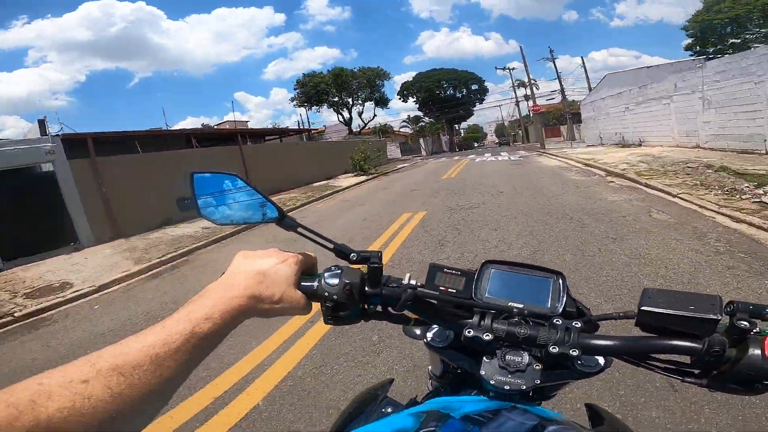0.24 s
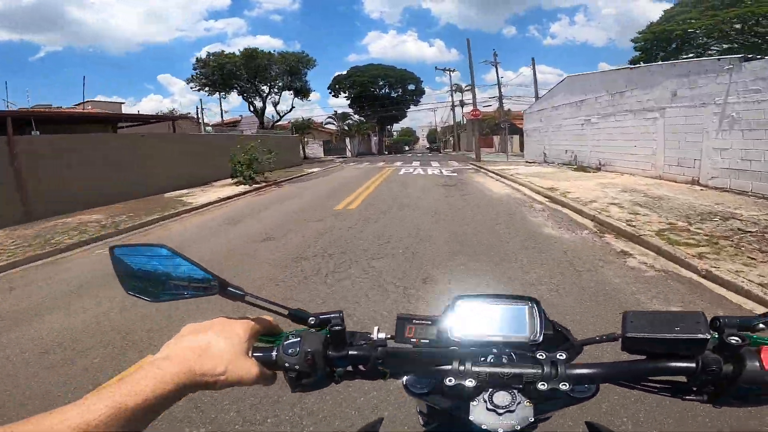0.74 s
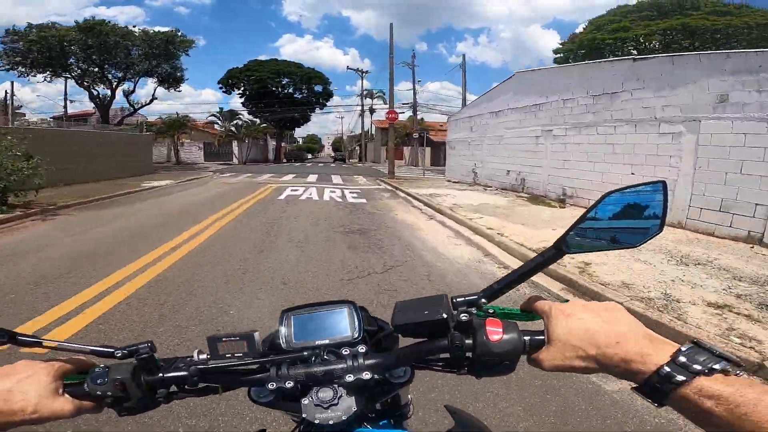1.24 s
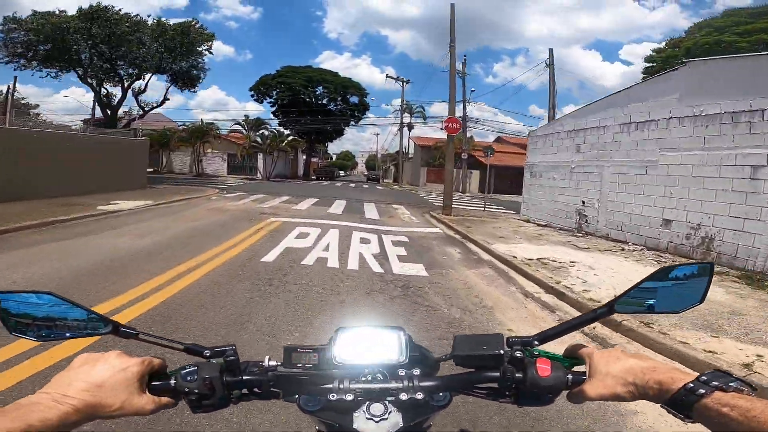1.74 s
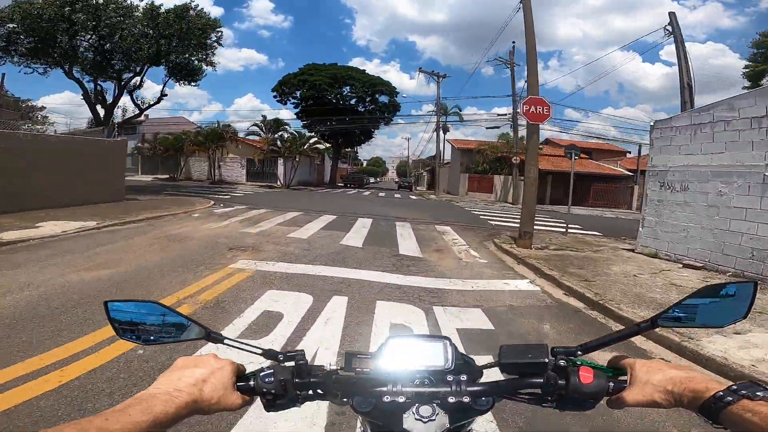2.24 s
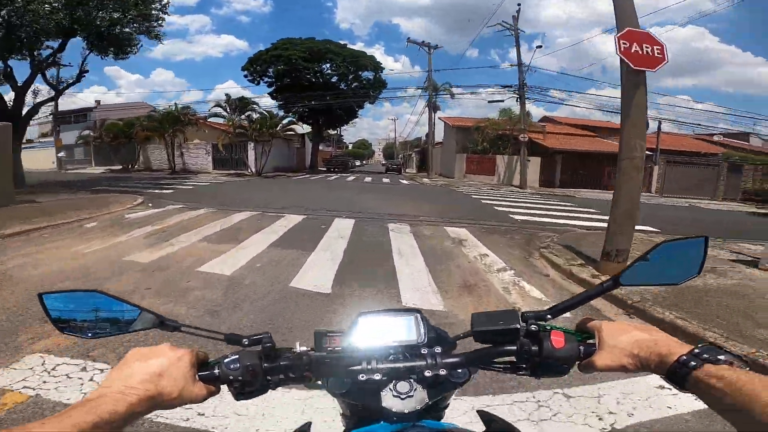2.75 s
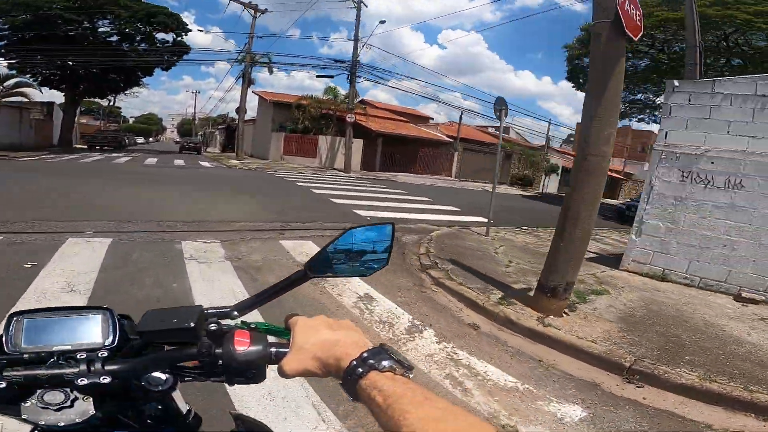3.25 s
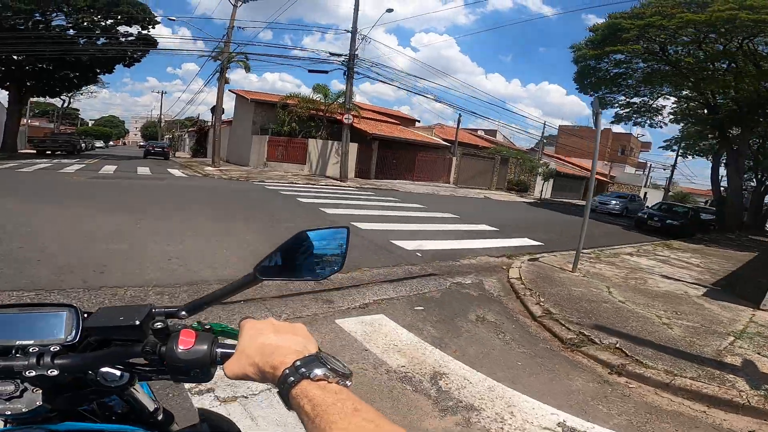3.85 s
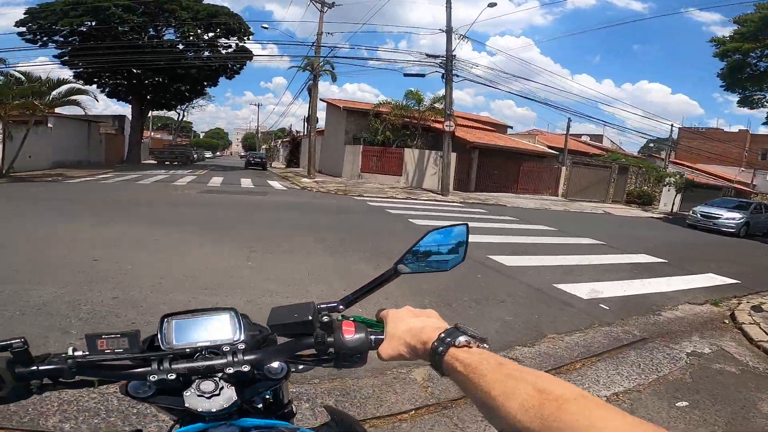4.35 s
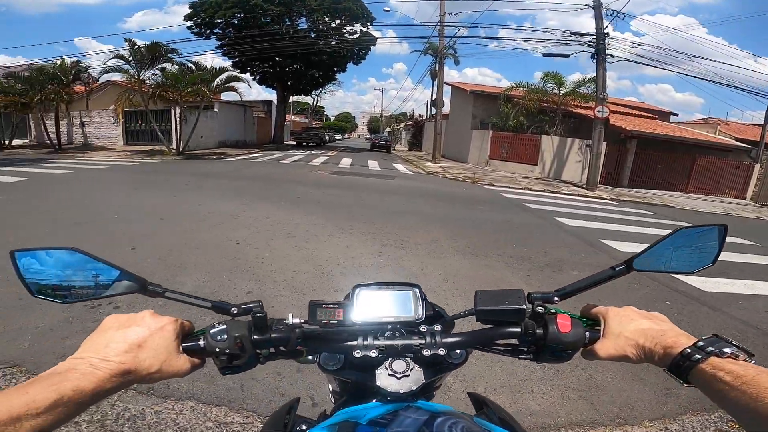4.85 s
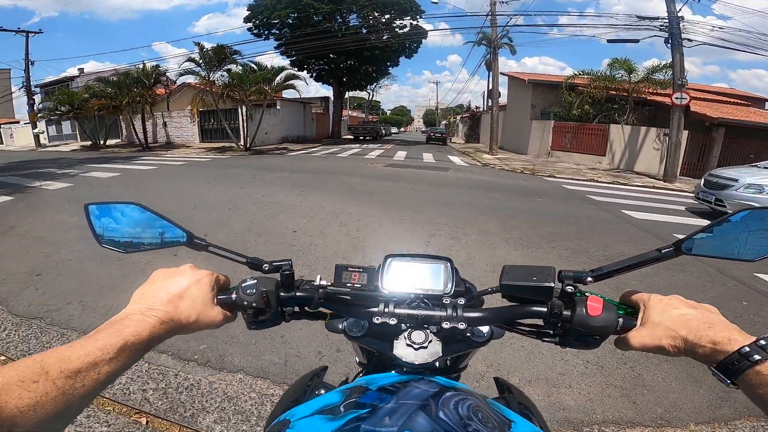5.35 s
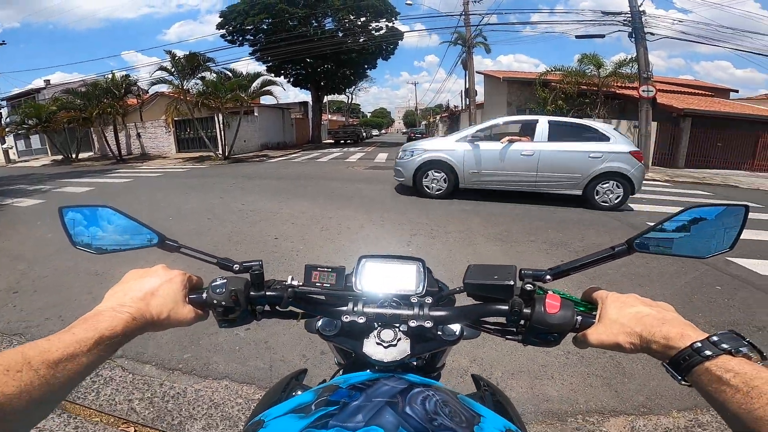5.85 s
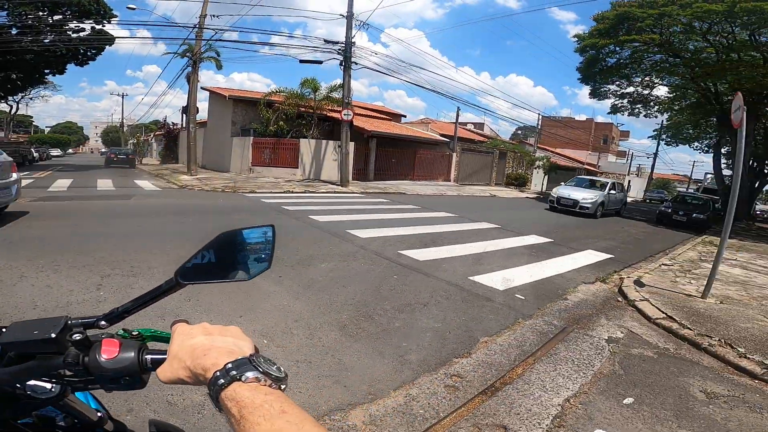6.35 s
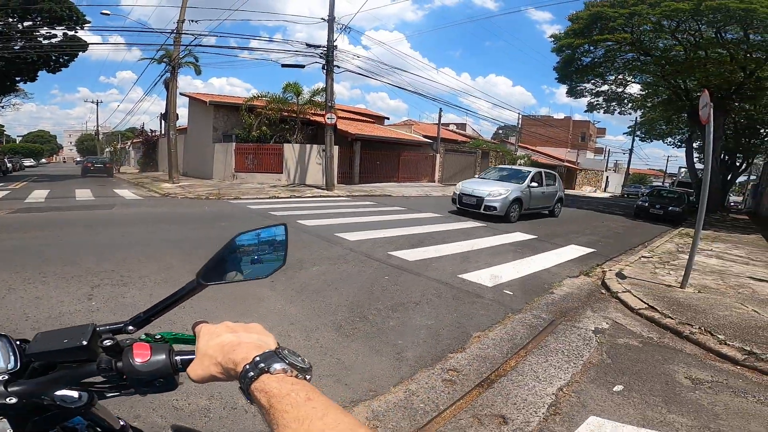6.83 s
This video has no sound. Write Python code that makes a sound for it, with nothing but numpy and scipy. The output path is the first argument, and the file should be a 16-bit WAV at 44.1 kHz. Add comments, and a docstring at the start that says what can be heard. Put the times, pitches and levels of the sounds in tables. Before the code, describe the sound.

Close, dry outdoor sound from a motorcycle saddle, dominated by a four-cylinder engine through a loud open exhaust. It starts at higher revs, around 110 firings a second, and falls abruptly by 0.3 s with a brief sag in its bark. From 0.4 to 1.4 s it pulls smoothly at low revs, pitch rising slightly; a thin squeak sounds near 1.1 s. At about 1.4 s the throttle shuts and the note drops, becoming rougher. Tiny high brake chirps run from 1.7 to 2.5 s, with a dull gearbox clunk at 2.0 s. Revs bottom out near 2.3 s, then recover to a steady, loping idle near 80 firings a second by 3.5 s: deep boom, hollow bark, raspy tailpipe, fine valve ticking, uneven weak beats. A crisp metallic clack comes at 5.8 s, smaller ones around 6.3 and 7 s, while a faint car-like rush swells beneath the idle around 6.3 s.

```python
"""A road junction, from a motorcycle's saddle: four cylinders and an open exhaust, close to the microphone.
The bike rolls up pulling briefly at very low revs, the throttle shuts, and it settles into a loud, loping idle.
Each firing rings the pipe as drone, bark, honk and blare, low to high, over a boom at the firing rate.
Noise shaped by the firings makes the tailpipe's rasp and the valve gear's ticks; bands of noise make squeaks,
chirps and the rush of what is probably a passing car; noise bursts clack, a struck resonance clunks."""
import sys
import numpy as np
from scipy import signal
from scipy.fft import rfft, irfft
from scipy.io import wavfile
from scipy.ndimage import uniform_filter1d, minimum_filter1d

SR = 44100
rng = np.random.default_rng(int(sys.argv[2]) if len(sys.argv) > 2 else 0)


def wav_record(signal):
    """Record a signal, one row per channel, as 16-bit PCM in the file named by sys.argv[1]."""
    frames = np.transpose(np.atleast_2d(signal))
    bounded = np.clip(frames, -1, 1)
    # unit amplitude maps onto the largest positive 16-bit level
    quanta = np.round(bounded * 32767).astype(np.int16)
    wavfile.write(sys.argv[1], SR, quanta)


N = 312669
TIME = np.arange(N) / SR
IDLE_HZ = 79.5  # firings per second at idle


def from_db(db):
    """Decibels to gain."""
    return 10 ** (np.asarray(db) / 20)


def in_time(rows):
    """The columns of a curve at every sample."""
    s, *columns = np.transpose(rows)
    return [np.interp(TIME, s, c) for c in columns]


def moment(centre_s, half_length_s):
    """A bell-shaped swell that peaks at 1 and is 1/e at the half length."""
    return np.exp(-((TIME - centre_s) / half_length_s) ** 2)


def evened(x, size=8820):
    """Level held at rms 1 over a fifth of a second; faster throbs stay."""
    return x / np.sqrt(np.maximum(uniform_filter1d(x * x, size), 1e-14))


def cut(x, hz, kind, order=4):
    """Butterworth filter."""
    return signal.sosfilt(signal.butter(order, hz, kind, fs=SR, output="sos"), x)


def resonate(x, modes):
    """Parallel resonances of (frequency [Hz], width [Hz], gain [dB])."""
    out = np.zeros(N)
    for hz, width, db in modes:
        r = np.exp(-np.pi * width / SR)
        zeros = np.array([1, 0, -1]) * (1 - r * r) / 2
        poles = [1, -2 * r * np.cos(2 * np.pi * hz / SR), r * r]
        out += from_db(db) * signal.lfilter(zeros, poles, x + 1e-18)
    return out


def coloured(x, spectrum, size=2048):
    """Causal (minimum-phase) filter of unit energy that follows a spectrum."""
    hz, db = np.transpose(spectrum)
    grid = np.maximum(np.arange(size // 2 + 1) * SR / size, 1)
    gain = from_db(np.interp(np.log(grid), np.log(hz), db))
    cepstrum = irfft(np.log(gain))[:size // 2]
    response = irfft(np.exp(rfft(2 * cepstrum, size)))
    return signal.fftconvolve(x, response / np.linalg.norm(response))[:N]


def clicks(times, sizes):
    """Impulses placed between samples."""
    at = np.clip(times * SR, 0, N - 2)
    whole = at.astype(int)
    early = np.bincount(whole, sizes * (1 - at + whole), N)
    return early + np.bincount(whole + 1, sizes * (at - whole), N)


def dying(x, decay_s):
    """Every impulse becomes an exponential tail that falls to 1/e in decay_s."""
    return signal.lfilter([1], [1, -np.exp(-1 / (decay_s * SR))], x + 1e-18)


def wander(hz):
    """Slow chance of spread 1, changing about hz times a second."""
    slow = cut(rng.standard_normal(N + SR), hz, "low", order=2)[SR:]
    return slow / np.std(slow)


# engine speed: (time [s], firing rate [1/s])
SPEED = [(0, 109), (.07, 110), (.15, 86), (.27, 87.8), (.34, 74.9), (.6, 77.4), (1.27, 85.65),
         (1.42, 82.85), (1.5, 75.8), (1.75, 74.8), (2.05, 70.9), (2.35, 70.1), (2.6, 74.15), (3.0, 77.65),
         (3.5, 78.65), (4.2, 79.9), (4.9, 79.1), (5.25, 80.75), (5.6, 79.35), (6.3, 79.9), (7.09, 80.65)]
# throttle: (time [s], load [1 pulling, 0 throttle shut])
LOAD = [(0, 1), (1.41, 1), (1.49, .1), (7.09, 0)]


def crankshaft():
    """Load, speed and firings counted so far; with the throttle shut the count hunts a little."""
    load, speed = np.clip(in_time(LOAD)[0], 0, 1), in_time(SPEED)[0]
    count = np.cumsum(speed) / SR + .03 * (1 - load) * wander(7)
    return load, speed, count


# the lope, two engine cycles in firing order, at full raggedness: (strength [dB], lateness [ms],
# flare of the bark [dB], flare of the honk [dB], flare of the blare [dB])
LOPE = [(2.5, 0, 1.5, 0, 3), (.5, .15, .5, 0, -5), (-.5, .08, -2, 0, -2), (-1, -.15, -1.5, 3, 1.5),
        (1.5, -.03, .5, -1, 1), (.5, .1, .5, 1, -3), (-.5, .02, -.5, 0, -.5), (0, -.15, .5, -1, 4.5)]
# one place in the lope often burns poorly; any other firing does so now and then
WEAK_SLOT, WEAK_CHANCE, STRAY_CHANCE = 2, .8, .02
STUMBLE_DB = -4  # with the throttle shut; fades out under load


def firings(count, load, scatter_db=2.86, jitter_ms=0.18, loaded_roughness=0.53, next_share=0.047):
    """Times and strengths: steadier under load, ragged with the throttle shut; a stumble weakens the next."""
    number = np.arange(int(count[-1]))
    times = np.interp(number, count, TIME)
    pulling = np.interp(times, TIME, load)
    rough = 1 - (1 - loaded_roughness) * pulling
    slot = number % len(LOPE)
    lope_db, late_ms = np.array(LOPE)[slot].T[:2]
    chance = rng.standard_normal((len(number), 2))
    stumbles = rng.random(len(number)) < np.where(slot == WEAK_SLOT, WEAK_CHANCE, STRAY_CHANCE)
    stumble_db = STUMBLE_DB * (1 - pulling) * (stumbles + next_share * np.roll(stumbles, 1))
    times = times + rough * (late_ms + jitter_ms * chance[:, 0]) / 1000
    return times, from_db(rough * (lope_db + scatter_db * chance[:, 1]) + stumble_db)


def flares(count, load):
    """At idle bark, honk and blare each flare [dB] at their own place in the lope, now more, now less."""
    slots = np.arange(len(LOPE))
    out = []
    for flare_db in np.transpose(LOPE)[2:]:
        # half a firing after the front
        in_lope = np.interp(count - .5, slots, flare_db, period=len(LOPE))
        out.append((1 - load) * (1 + .35 * wander(3)) * in_lope)
    return out


# throttle snapped shut, firings go soft until the engine catches itself; each voice takes its own share:
# (time [s], sag [dB], recovery [s])
LIFTS = [(0.077, -4, 0.24), (1.417, -1, 0.36)]
LIFT_FALL_S = 0.0065


def throttle_sag():
    """Loss in dB after each lift of the throttle: a quick fall, a slower recovery."""
    return sum(db * np.clip((TIME - s) / LIFT_FALL_S, 0, 1) * moment(s, recovery)
               for s, db, recovery in LIFTS)


# rises and drops of the exhaust notes and noise while the engine pulls:
# (time [s], half length [s], drone [dB], bark [dB], honk [dB], blare [dB], rasp and clatter [dB])
PULLING_SHIFTS = [(.0, 0.053, -3, -19, -10, -22, 4), (0.069, 0.051, -16, -13.5, -29, -14, -13.5),
                  (0.235, 0.28, 4, 6.5, 6, 7.5, 2), (.305, 0.021, 1, 1, -15, 7, -0.5),
                  (0.937, 0.55, 2, 0.5, -8, 0, 0), (1.41, 0.15, -4, 0, -14, -4.5, -5.5)]
# at idle the weight shifts slowly from one note of the pipe to another; same columns
IDLE_SHIFTS = [(1.85, 0.13, -2.5, -0.77, 1.5, 1, 0.075), (2.25, .25, -4, 0.12, 5, 6, 0),
               (2.72, 0.26, 0.5, 1, -2.5, 4, 0.018), (4.05, 0.15, -1.5, 0.46, 2.5, -0.5, 0),
               (4.6, 0.11, 4, -1.5, 2, 2, 0.18), (4.93, 0.27, 1, -.5, -10, 2.5, 0),
               (5.35, 0.23, 0.5, -1.5, -2.5, 2.5, 0.6), (6.45, 0.19, 1, -0.24, 3, -3, 0)]


def shifting(rows):
    """Gain in dB of drone, bark, honk, blare and noise through a set of rises and drops."""
    return sum(np.outer(db, moment(s, length)) for s, length, *db in rows)


def boom(count, times, sizes, load, waver_db=2.0, rumble_idle_db=-22, rumble_load_db=-30):
    """The firing rate itself, over a low rumble; it sags with weak firings and wavers most at idle."""
    waver = from_db(waver_db * (1 - .7 * load) * wander(24))
    swell = np.interp(TIME, times, sizes ** (1 / 4)) * waver
    # phase sways once an engine cycle and once every two, most at the weak firing
    turn = 2 * np.pi * (count - WEAK_SLOT - .5) / len(LOPE)
    sway = (1 - load) * (.05 * np.cos(2 * turn) + .06 * np.cos(turn) + .04 * wander(10))
    tone = evened(swell * np.cos(2 * np.pi * (count + sway)))
    rumble = cut(rng.standard_normal(N), 270, "low", order=2)
    rumble = evened(cut(rumble, 76, "high", order=3))
    rumble_db = rumble_idle_db + (rumble_load_db - rumble_idle_db) * load
    return tone + from_db(rumble_db) * rumble


def collector(x, round_trip_s=0.004152, reflection=0.64):
    """Pulses bounce between the headers before they leave: an allpass smears each one."""
    gap, g = np.zeros(int(round_trip_s * SR)), np.clip(reflection, 0, .7)
    return signal.lfilter(np.r_[g, gap, 1], np.r_[1, gap, g], x + 1e-18)


def pipe(fronts, puffs, load, idle_modes, load_modes, idle_top_hz, idle_turbulence, load_turbulence):
    """Sharp blow-down fronts and turbulent puffs ring the pipe; at idle each note wavers on its own."""
    idle = resonate(fronts + idle_turbulence * puffs, idle_modes)
    idle = cut(idle, idle_top_hz, "low", order=10)
    idle = evened(idle * from_db(.8 * wander(12)))
    loaded = evened(resonate(fronts + load_turbulence * puffs, load_modes))
    return np.sqrt(1 - load) * idle + np.sqrt(load) * loaded


# the pipe's lowest resonances; under load its gas is hotter and faster:
# (frequency [Hz], width [Hz], relative gain [dB])
DRONE_IDLE = [(121, 71, -2), (250.1, 15.5, 4)]
DRONE_LOAD = [(165.6, 11, 8.2), (256.6, 70, 10.8), (314, 7, 18)]


def drone(fronts, puffs, load):
    """The pipe's lowest notes, rung by the firings."""
    x = pipe(fronts, puffs, load, DRONE_IDLE, DRONE_LOAD,
             idle_top_hz=335, idle_turbulence=.036, load_turbulence=.02)
    return cut(cut(x, 349, "low"), 102.6, "high")


# the pipe's loudest resonances: (frequency [Hz], width [Hz], relative gain [dB])
BARK_IDLE = [(390, 8.6, -0.5), (469.4, 64, 8), (514, 36, -7)]
BARK_LOAD = [(386.6, 3.2, -9), (470.4, 30, -10.5), (493.3, 14, -11)]


def bark(fronts, puffs, load):
    """The pipe's loudest resonances, above the drone."""
    x = pipe(fronts, puffs, load, BARK_IDLE, BARK_LOAD,
             idle_top_hz=560, idle_turbulence=.016, load_turbulence=.008)
    return cut(cut(x, 526, "low"), 396, "high", order=6)


# the resonance above the bark: (frequency [Hz], width [Hz], relative gain [dB])
HONK_IDLE = [(638.7, 49, 0)]
HONK_LOAD = [(675, 30, 0)]


def honk(fronts, puffs, load):
    """A single resonance of the pipe, higher under load."""
    x = pipe(fronts, puffs, load, HONK_IDLE, HONK_LOAD,
             idle_top_hz=780, idle_turbulence=.036, load_turbulence=.035)
    return cut(x, 583, "high", order=6)


# the pipe's highest resonances: (frequency [Hz], width [Hz], relative gain [dB])
BLARE_IDLE = [(811, 40.5, 0)]
BLARE_LOAD = [(812, 30, -11), (846.6, 24, 4)]


def blare(fronts, puffs, load):
    """The pipe's highest notes, rung by the firings."""
    x = pipe(fronts, puffs, load, BLARE_IDLE, BLARE_LOAD,
             idle_top_hz=980, idle_turbulence=.028, load_turbulence=.014)
    return cut(cut(x, 904, "low", order=8), 777, "high", order=6)


# single harmonics that sing out or drop away: (time [s], half length [s], frequency [Hz], gain [dB])
SINGING = [(.025, 0.037, 304, 13), (0.06, 0.048, 530, 13), (0.195, 0.16, 270, 6.5), (0.384, 0.02, 307, 16),
           (0.495, 0.24, 760, 9), (0.635, .06, 397, 2), (0.843, 0.099, 304, 1), (.88, 0.2, 404, -9),
           (1.246, .05, 171, -11), (1.264, 0.041, 685, 9.5), (1.365, 0.03, 406, 11), (2.252, 0.43, 618, 7),
           (2.35, 0.26, 426, 10.5), (2.6, 0.44, 292, 5.5), (3.232, 0.31, 225, 8.5), (3.302, 0.37, 390, 6.5)]
SINGING_WIDTH_HZ = 22


def singing(notes):
    """Narrow resonances lift or hollow out single harmonics of the pipe for a moment."""
    out = notes.copy()
    for s, length, hz, db in SINGING:
        added = from_db(db * moment(s, length)) - 1
        out += added * resonate(notes, [(hz, SINGING_WIDTH_HZ, 0)])
    return out


# spectrum of the gas at the tailpipe: (frequency [Hz], relative level [dB])
RASP = [(600, -30), (950, 7), (1150, -1.5), (1400, -1.5), (1680, -8), (1950, -18.5), (2400, -38)]


def rasp(pulses, fronts, load, idle_front=4.3, load_front=40.0, steady=0.62):
    """Gas tears out of the tailpipe at every firing, with a harder front under load."""
    jet = (dying(pulses, decay_s=0.034) + steady) * rng.standard_normal(N)
    front = (idle_front + load_front * load) * fronts
    return evened(cut(coloured(jet + front, RASP), 820, "high"))


# spectrum of the valve gear, chain and gears: (frequency [Hz], relative level [dB])
CLATTER = [(1500, -2.5), (2050, 2), (2380, 1.5), (2770, 5), (3300, -2.5), (4000, -2), (4600, -4),
           (5300, -2.5), (6800, -1.5), (8500, -4), (10500, -10), (13000, -18.5), (15500, -58)]


def clatter(times, whirr=0.62, second_valve=0.067, valve_lag_s=0.0058):
    """Valves seat twice a firing, over the even whirr of chain and gears."""
    sizes = from_db(2.8 * rng.standard_normal((len(times), 2)))
    ticks = clicks(times, sizes[:, 0])
    ticks = ticks + second_valve * clicks(times + valve_lag_s, sizes[:, 1])
    metal = (dying(ticks, decay_s=0.013) + whirr) * rng.standard_normal(N)
    return evened(cut(coloured(metal, CLATTER), 1800, "high", order=2))


# thin squeaks, faint broad rustles, and the rush of what is probably a passing car:
# (time [s], frequency [Hz], width [Hz], level [dB], half length [s])
SQUEAKS_AND_RUSHES = [(.5, 7400, 300, -49, .05), (.97, 6300, 250, -53, .04), (1.108, 6530, 170, -33, .022),
                      (1.15, 6490, 100, -45, .05), (.88, 1720, 600, -42, .22), (.9, 3450, 700, -52, .38),
                      (2.35, 3064, 700, -51.5, .32), (2.5, 1350, 500, -40.5, .45),
                      (6.297, 1550, 380, -42.5, .61), (6.65, 2770, 260, -50, .48)]
# tiny chirps, probably of the brake: (time [s], frequency [Hz], level [dB])
CHIRPS = [(1.664, 7400, -45), (1.945, 8160, -46), (2.11, 8600, -48), (2.155, 8750, -45.5),
          (2.225, 7700, -49), (2.385, 8400, -47), (2.455, 8200, -54)]
CHIRP_WIDTH_HZ, CHIRP_S = 670, 0.0036


def squeaks_and_rushes():
    """Unsteady bands of noise, narrow or broad, that swell and fade; the chirps are the shortest."""
    out = np.zeros(N)
    chirps = [(s, hz, CHIRP_WIDTH_HZ, db, CHIRP_S) for s, hz, db in CHIRPS]
    for s, hz, width_hz, db, length in SQUEAKS_AND_RUSHES + chirps:
        mode = [(hz, width_hz, 0)]
        band = evened(resonate(resonate(rng.standard_normal(N), mode), mode))
        out += from_db(db) * moment(s, length) * band
    return out


# clacks of the levers and gearbox: (time [s], strength [dB])
CLACKS = [(1.9947, -55), (2.031, -38.5), (2.076, -54), (2.878, -46), (3.929, -42), (5.57, -49),
          (5.765, -28), (5.823, -42), (6.25, -42), (6.324, -40), (6.35, -47), (6.93, -42), (7.069, -39)]
# their spectrum: (frequency [Hz], relative level [dB])
CLACK_COLOUR = [(900, -23), (1600, 8.5), (2800, 3), (3400, 3), (4100, 5.5), (4600, -3), (5400, 5),
                (8000, -4), (14000, -19)]


def clacks():
    """Short, dry knocks of metal: decaying bursts of coloured noise."""
    when, db = np.transpose(CLACKS)
    bursts = dying(clicks(when, from_db(db)), decay_s=0.013) * rng.standard_normal(N)
    return coloured(bursts, CLACK_COLOUR)


# the gearbox's modes: (frequency [Hz], width [Hz], relative gain [dB])
CLUNK_MODES = [(202, 85, 7.5), (1300, 600, -16)]
CLUNK_S, CLUNK_DB = 2.012, 26.5  # time of the downshift, strength of its impulse


def clunk(top_hz=1600):
    """The gearbox drops a gear with one dull knock."""
    knock = clicks(np.array([CLUNK_S]), np.array([from_db(CLUNK_DB)]))
    return cut(resonate(knock, CLUNK_MODES), top_hz, "low", order=6)


# the rider looks aside and the head shades blare, rasp and clatter: (time [s], half length [s], level [dB])
HEAD_TURNS = [(3.93, 0.33, -2.5), (7.0, 0.42, -1.5)]


def head_shadow():
    """Loss in dB while the rider's head is turned."""
    return sum(db * moment(s, length) for s, length, db in HEAD_TURNS)


# how each voice follows the engine, before the trim at the rider: (level at idle [dB],
# level under load [dB], share of the sag [ratio], rise with speed above idle [dB per firing/s])
BOOM = (-9.5, -9.5, 0.9, 0.23)
DRONE = (-20.5, -20.5, 1.1, 0.67)
BARK = (-12.5, -11.5, 5.5, 0.6255)
HONK = (-21.5, -29, 4, 0.89)
BLARE = (-19.5, -23.5, 4.5, 1.08)
JET = (-33.5, -31, 2.9, 0.7)
VALVES = (-44, -42, 2, 0.6158)
# engine braking below idle speed lifts drone, rasp and clatter [dB per firing/s]
LUG_DRONE_DB, LUG_NOISE_DB = 1.3, 0.75


def scene():
    """One crankshaft drives exhaust and valve gear; load, speed and throttle set the level of every voice."""
    load, speed, count = crankshaft()
    sag_db, shadow_db = throttle_sag(), head_shadow()
    lug = (1 - load) * np.maximum(IDLE_HZ - speed, 0)
    drone_db, bark_db, honk_db, blare_db, noise_db = shifting(PULLING_SHIFTS) + shifting(IDLE_SHIFTS)
    bark_flare_db, honk_flare_db, blare_flare_db = flares(count, load)
    drone_db = drone_db + LUG_DRONE_DB * lug
    bark_db = bark_db + bark_flare_db
    honk_db = honk_db + honk_flare_db
    blare_db = blare_db + blare_flare_db + shadow_db
    noise_db = noise_db + LUG_NOISE_DB * lug + shadow_db

    def level(voice, extra_db=0):
        """Gain of one voice over time."""
        idle_db, load_db, sag_share, speed_db = voice
        engine_db = idle_db + (load_db - idle_db) * load + speed_db * (speed - IDLE_HZ)
        return from_db(engine_db + sag_share * sag_db + extra_db)

    times, sizes = firings(count, load)
    pulses = clicks(times, sizes)
    fronts = collector(pulses)
    puffs = dying(pulses, decay_s=.009) * rng.standard_normal(N)
    notes = (level(DRONE, drone_db) * drone(fronts, puffs, load)
             + level(BARK, bark_db) * bark(fronts, puffs, load)
             + level(HONK, honk_db) * honk(fronts, puffs, load)
             + level(BLARE, blare_db) * blare(fronts, puffs, load))
    exhaust = level(BOOM) * boom(count, times, sizes, load) + singing(notes)
    exhaust = exhaust + level(JET, noise_db) * rasp(pulses, fronts, load)
    engine = exhaust + level(VALVES, noise_db) * clatter(times)
    at_rider = from_db(-2.85) * engine
    return (at_rider + squeaks_and_rushes() + clacks() + clunk())[None]


CUTOFF_HZ = 15700


def record(dry, size=221):
    """A fast limiter holds the rare high peaks; the sound fades in, and the top is cut steeply."""
    needed = np.minimum(1, .86 / (np.abs(dry) + 1e-9))
    limiter = uniform_filter1d(minimum_filter1d(needed, 2 * size), size)
    fade_in = np.minimum(1, np.arange(N) / size)
    steep = signal.ellip(10, .1, 80, CUTOFF_HZ, fs=SR, output="sos")
    return signal.sosfilt(steep, dry * limiter * fade_in)


dry = scene()
out = record(dry)
wav_record(out)
```